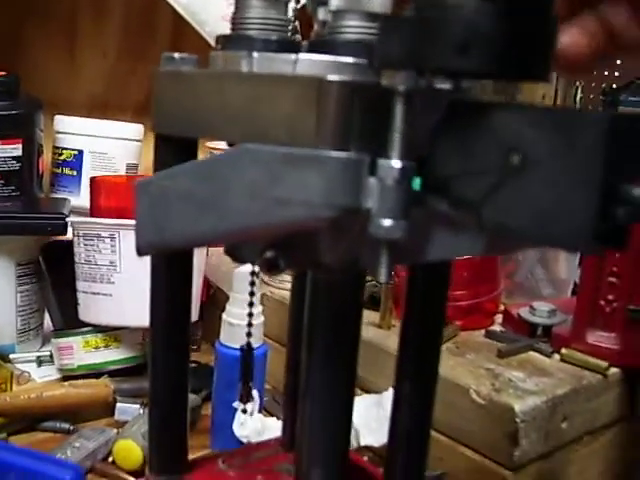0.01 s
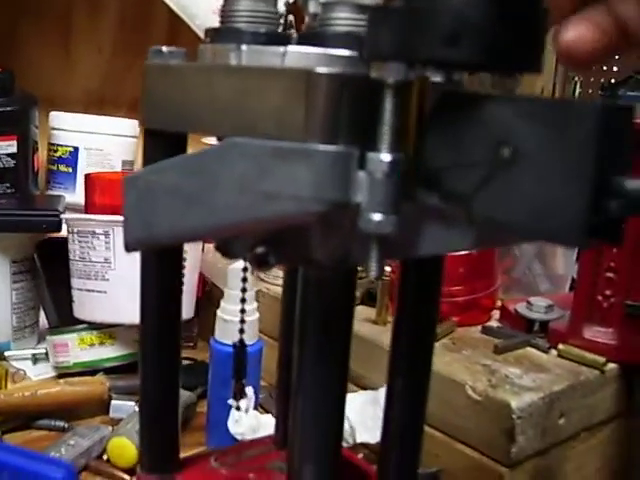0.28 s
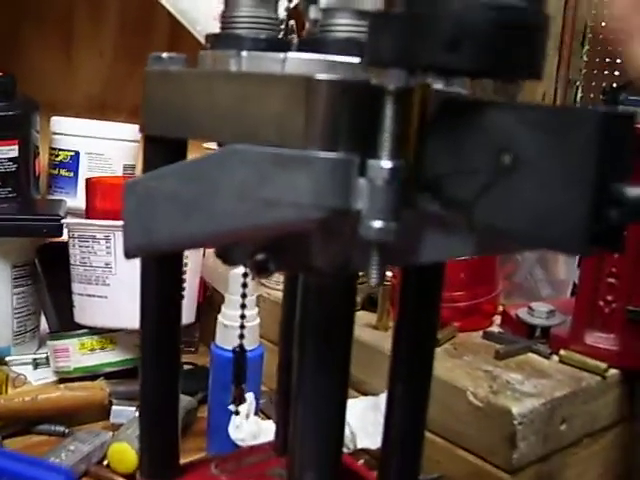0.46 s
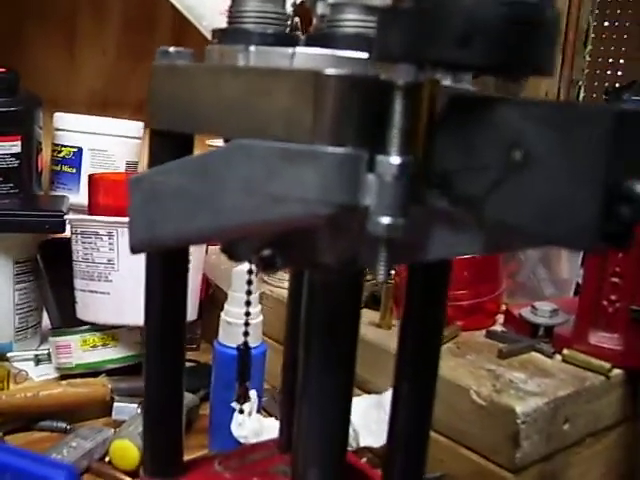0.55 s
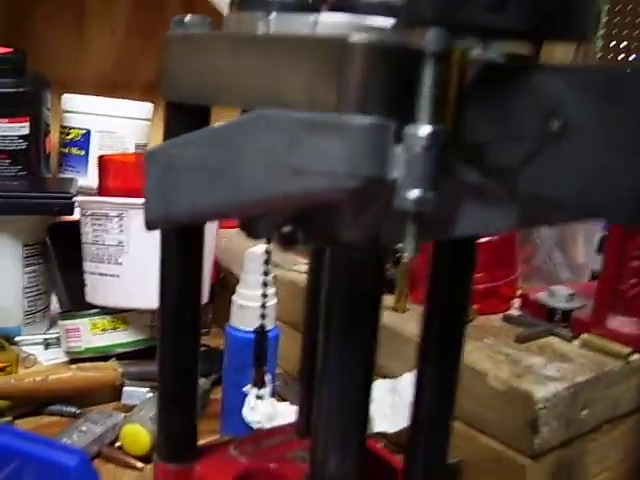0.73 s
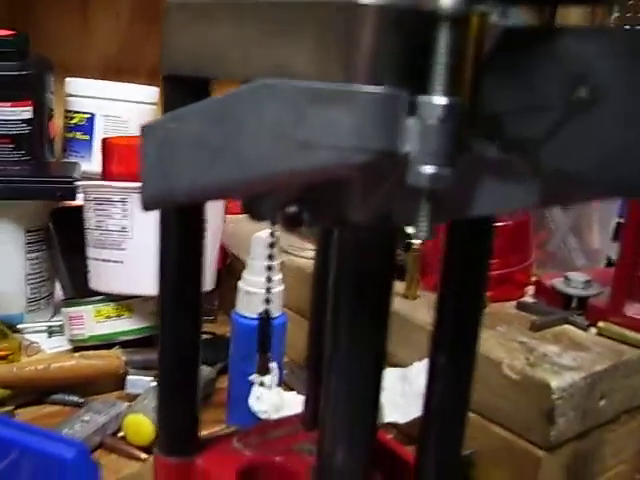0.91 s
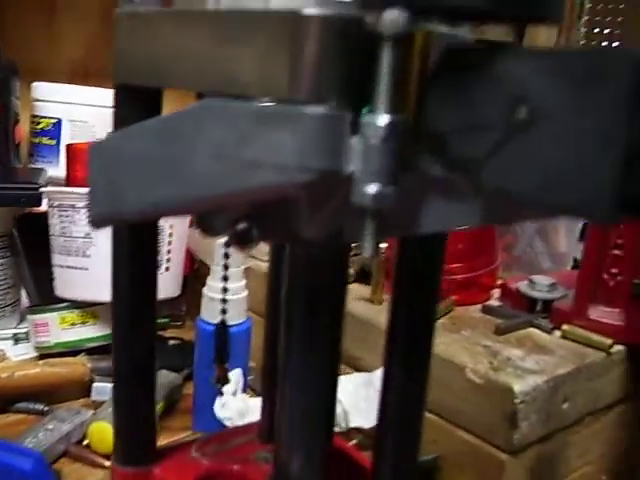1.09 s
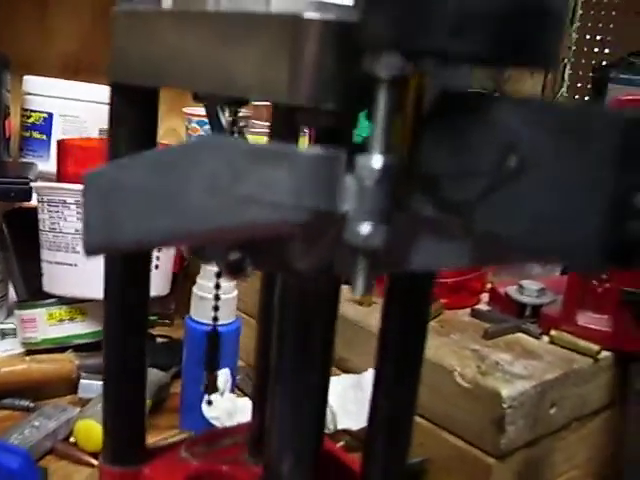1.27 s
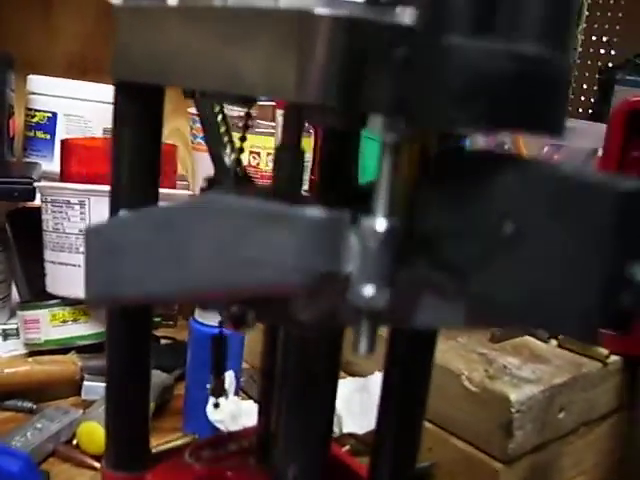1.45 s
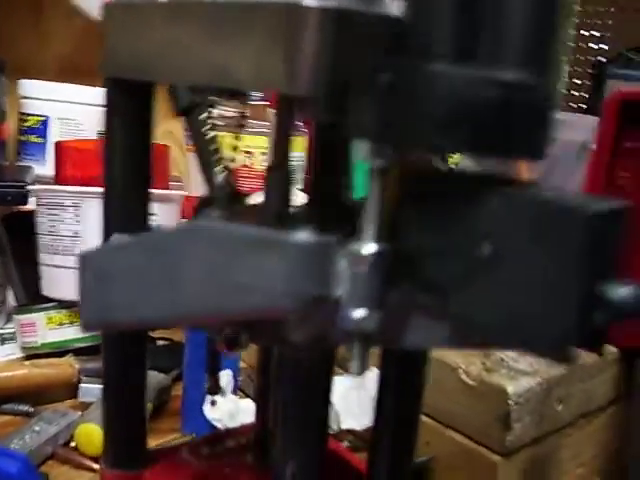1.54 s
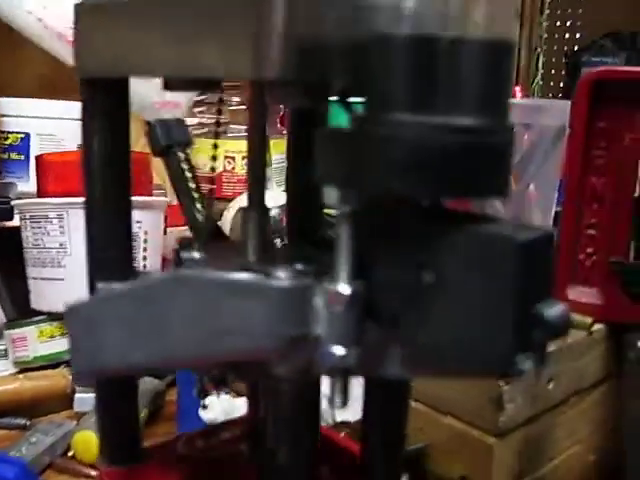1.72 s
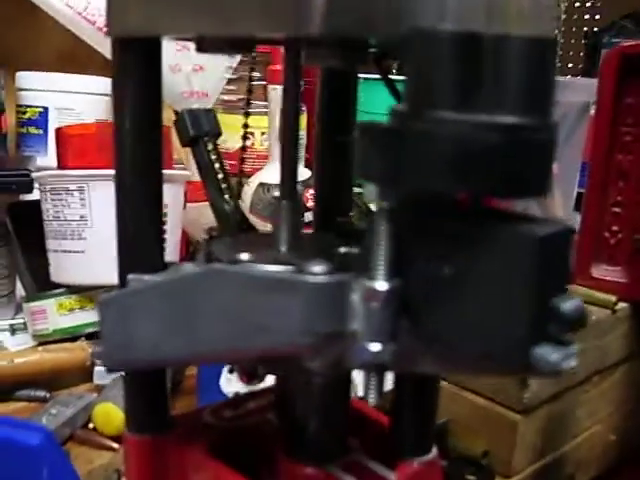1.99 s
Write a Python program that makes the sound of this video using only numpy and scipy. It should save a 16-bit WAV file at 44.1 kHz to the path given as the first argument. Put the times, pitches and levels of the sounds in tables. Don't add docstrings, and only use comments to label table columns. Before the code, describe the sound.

A hand-operated metal press, close and dry on a wooden bench. Small ticks and tinkles from 0.1 s lead to a very loud, distorted latch snap at 0.21 s, with rattling fading by 0.5 s. Mostly hiss until soft knocks at 0.9-1.2 s. From 1.35 s the ram clatters and slides grittily, landing with a loud clunk at 1.75 s, then settling rattles. Narrow, dull small-microphone sound throughout.

```python
import sys
import numpy as np
from scipy import signal
from scipy.fft import rfft, irfft
from scipy.io import wavfile

SR = 44100
rng = np.random.default_rng(int(sys.argv[2]) if len(sys.argv) > 2 else 0)


def amp(db):
    return 10 ** (np.asarray(db, float) / 20)


def write(x):
    x = np.atleast_2d(x).T
    wavfile.write(sys.argv[1], SR, np.round(np.clip(x, -1, 1) * 32767).astype(np.int16))


N = 88200

# frequency_hz, density_db
AIR_SPECTRUM = [(25, -19.5), (60, -12), (85, -16.5), (200, -7), (600, -3.5), (1500, -8.5), (3500, -16),
                (4100, -25)]
# start_s, level_db
JIGGLE = [
    (0, -42.5),
    (.05, -55),
    (.13, -32),
    (.19, -51),
    (.23, -33.5),
    (.3, -47.5),
    (.52, -54.5),
]

# start_s, level_db (peak), pitch_hz (centre), ring_t60_s
PLATE_TINKLES = [(.004, -43, 1280, 0.067), (.083, -33.5, 1370, .03), (.107, -23.5, 1190, 0.055),
                 (.122, -23, 1260, 0.14), (.137, -28.5, 1300, 0.07), (.197, -25, 1300, 0.064),
                 (.2183, -4.5, 1114, 0.024), (.227, -15, 1110, .04), (.233, -14, 1330, 0.043),
                 (.245, -17.5, 1210, 0.029), (.283, -22.5, 1160, 0.065), (.295, -27, 1150, .02),
                 (.307, -28, 1280, 0.035), (.345, -35.5, 1210, 0.034), (.462, -30.5, 1360, 0.046),
                 (.474, -34, 1340, 0.068), (.484, -36, 1400, .03)]
PLATE_PINGS = [
    (.4135, -28, 1450, 0.04),
    (.4375, -30, 1150, 0.11),
    (.511, -42, 1230, .04),
]
FRAME_KNOCKS = [(.007, -33.5, 644, 0.12), (.1305, -34.5, 806, .02), (.915, -38, 650, .05),
                (.922, -29.5, 554, 0.06), (1.072, -25, 810, .03), (1.0755, -20.5, 634, 0.04),
                (1.094, -23.5, 1104, .03), (1.0975, -17.5, 588, 0.05), (1.107, -27.5, 700, .05),
                (1.118, -29, 1200, .03), (1.1932, -22, 900, 0.03), (1.199, -25.5, 896, .05),
                (1.362, -30, 609, 0.1), (1.369, -20.5, 1206, .03), (1.384, -10, 927, 0.03),
                (1.3885, -10.5, 970, .04), (1.398, -19, 906, .04), (1.404, -32.5, 660, 0.067),
                (1.589, -23.5, 670, 0.041), (1.741, -13, 746, .04), (1.7455, -1.5, 1023, 0.025),
                (1.7512, -3, 740, 0.025), (1.7568, -9, 970, 0.029), (1.766, -22.5, 900, 0.03),
                (1.773, -17.5, 950, .03), (1.864, -26, 620, .1), (1.884, -21.5, 668, .1)]
FRAME_RINGS = [(.221, -16.5, 671, 0.11), (.925, -35.5, 545, 0.17), (1.076, -28, 342, 0.029),
               (1.195, -26, 1500, 0.03), (1.198, -25.5, 652, 0.13), (1.288, -32.5, 980, 0.31),
               (1.293, -33, 345, 0.69), (1.334, -33, 351, 0.52), (1.389, -16, 616, 0.076),
               (1.44, -30.5, 351, 0.13), (1.495, -31, 438, .2), (1.53, -36, 983, 0.26),
               (1.565, -30, 558, 0.1), (1.635, -29.5, 970, 0.24), (1.66, -27, 1024, 0.18),
               (1.675, -26.5, 430, 0.1), (1.755, -14.5, 1320, 0.12), (1.756, -10.5, 665, .08)]
LATCH_CHATTER = [(.1012, -20.5, 2200, .015), (.1178, -23.5, 2700, .025), (.1302, -17.5, 2180, .015),
                 (1.3008, -28.5, 3410, 0.027), (1.3592, -18, 3020, 0.03), (1.3685, -23, 2550, 0.048),
                 (1.381, -21.5, 2870, .03), (1.385, -14, 2580, .03), (1.389, -7.5, 2880, 0.03),
                 (1.3972, -14, 2380, 0.02), (1.405, -22, 3200, .03), (1.4182, -17, 2300, 0.027),
                 (1.4312, -11.5, 3510, 0.04), (1.441, -9.5, 2800, 0.029), (1.453, -19.5, 2490, .03),
                 (1.4609, -20.5, 2430, 0.04), (1.465, -14.5, 2420, .02), (1.477, -18, 3200, .02),
                 (1.4817, -21.5, 2410, 0.019), (1.586, -21, 2570, .03), (1.66, -25, 2570, .03),
                 (1.729, -27, 2870, 0.03), (1.742, -20, 3090, .03), (1.7476, -13, 2700, 0.058),
                 (1.7671, -18.5, 3550, 0.025), (1.777, -9, 3350, 0.015), (1.787, -19, 2770, 0.03),
                 (1.793, -20.5, 2970, .02), (1.8149, -19.5, 2780, 0.017), (1.9557, -30.5, 3470, 0.06)]
LATCH_TICKS = [(.1795, -38, 2690, .015), (.2118, 4.5, 3200, 0.012), (.2148, 2, 3100, 0.015),
               (.217, -0.5, 3400, .012), (.2195, -2.5, 2700, .015), (.2236, 0, 3200, 0.01),
               (.228, -12.5, 2800, .01), (.238, -19, 2860, 0.011), (.2485, -10.5, 3090, 0.0086),
               (.252, -18, 3000, .01), (.2622, -15, 3090, 0.0087), (.271, -16.5, 2775, 0.019),
               (.277, -20, 2710, 0.018), (.281, -17.5, 2536, 0.055), (.3188, -21.5, 3370, 0.018),
               (.3796, -25.5, 3560, 0.031), (1.0715, -28, 2290, 0.018), (1.077, -36, 2980, .015),
               (1.0928, -23, 2500, 0.015), (1.106, -34, 2300, .03), (1.2, -31, 2980, 0.03)]
BENCH_THUMPS = [
    (.11, -43, 127, .1),
    (.915, -43.5, 101, 0.25),
    (1.095, -45, 192, 0.11),
    (1.2, -39, 97, 0.34),
    (1.38, -32, 135, 0.11),
    (1.8, -38.5, 102, 0.38),
    (1.745, -25.5, 176.8, 0.34),
    (1.875, -38, 188, 0.23),
    (1.89, -40.5, 110, .25),
]

# time_s, rub_level_db, brightness_db
RAM_STROKE = [(1.25, -58, 1), (1.3, -47, -2), (1.355, -34, -15), (1.39, -27.5, 0), (1.45, -33, 1.5),
              (1.51, -34, 1), (1.6, -34.5, -7), (1.625, -35, -8), (1.68, -35, -3), (1.722, -34, -11),
              (1.77, -33.5, 6.5), (1.84, -36.5, 1), (1.9, -37, -1.5), (1.93, -44, -6.5), (1.96, -44, 4),
              (2.0, -58, -2)]

# frequency_hz, level_db
STEEL_MODES = [(1880, 5.5), (2110, 1.5), (2340, 3.5), (2400, -3.5), (2530, 2.5), (2655, -2.5), (2712, 4),
               (2895, -2), (2980, 7), (3070, -3), (3300, 6.5), (3450, 6), (3650, 3), (4000, 3)]
PLATE_MODES = [(940, 7.5), (1022, -14.5), (1112, 4.5), (1160, 1), (1236, 12), (1316, -11.5), (1390, 1.5),
               (1450, 8), (1530, -8)]
FRAME_MODES = [(300, -5), (345, -1), (440, 0.5), (545, -1), (625, 5), (690, 5), (770, 3.5), (845, 5),
               (910, 3.5), (990, 3), (1085, 2.5), (1330, 1), (1460, -10.5), (1650, -2)]
BENCH_MODES = [(62, -18.5), (104, -3.5), (128, 1), (188, 8), (250, 11)]


def evened(x):
    return x / np.sqrt(np.mean(x ** 2) + 1e-20)


def curve(points, column=1):
    p = np.array(points)
    return np.interp(np.arange(N) / SR, p[:, 0], p[:, column], left=-120)


def add(mix, start_s, sound):
    part = mix[round(start_s * SR):][:len(sound)]
    part += sound[:len(part)]


def blows(events, modes, reach_oct, contact_s):
    out = np.zeros(N)
    hz, db = np.transpose(modes)[:, :, None]
    luck = rng.standard_normal((len(events), 3, len(modes), 1))
    grit = rng.standard_normal((len(events), 1500))
    spread = 2.18
    for (start_s, peak_db, centre_hz, t60), (gain, decay, detune), rough in zip(events, luck, grit):
        count = len(rough)
        t = np.arange(count + round(1.2 * min(t60, 0.4) * SR)) / SR
        near = np.exp(-0.5 * (np.log2(hz / centre_hz) / reach_oct) ** 2)
        mode_t60 = t60 * np.exp(0.093 * decay) + 0.00072
        fade = amp(db + 2 * gain - 60 * t / mode_t60)
        onset = np.minimum(t[:count] / 0.00073, 1)
        push = rough * np.exp(-t[:count] / contact_s) * onset
        phase = 2 * np.pi * hz * (1 + 0.005 * detune) * t
        felt = abs(np.exp(1j * phase[:, :count]) @ push)[:, None] + 0.4 * np.linalg.norm(push)
        ring = (near * fade / felt * np.sin(phase)).sum(axis=0)
        ring = signal.fftconvolve(ring, push)
        band = signal.butter(3, [centre_hz / spread, centre_hz * spread], "band", fs=SR)
        ring = signal.lfilter(*band, ring)
        add(out, start_s, amp(peak_db) * ring / abs(ring).max())
    return out


def rubbed(modes, width_hz, spread_db):
    grains_per_s = 1600
    grains = amp(spread_db * np.minimum(rng.exponential(1, N), 5)) * rng.standard_normal(N)
    grains *= rng.random(N) < grains_per_s / SR
    out = np.zeros(N)
    r = np.exp(-np.pi * width_hz / SR)
    for k, (hz, db) in enumerate(modes):
        pole = [1, -2 * r * np.cos(2 * np.pi * hz / SR), r * r]
        delayed = np.roll(grains, 37 * k)
        out += amp(db) * signal.lfilter([1, 0, -1], pole, delayed)
    return evened(out)


def air():
    f, db = np.transpose(AIR_SPECTRUM)
    hz = np.fft.rfftfreq(N, 1 / SR)
    shape = amp(np.interp(np.log(hz + 1), np.log(f + 1), db))
    hiss = irfft(rfft(rng.standard_normal(N)) * shape, N)
    return amp(-46.5) * evened(hiss)


def loose_parts():
    moving = np.arange(N) < JIGGLE[-1][0] * SR
    plate_rub = rubbed(PLATE_MODES, 55, 1.5)
    steel_rub = amp(-11.5) * rubbed(STEEL_MODES, 130, 2.7)
    frame_rub = amp(-5.5) * rubbed(FRAME_MODES, 100, 2.3)
    return amp(curve(JIGGLE)) * moving * (plate_rub + steel_rub + frame_rub)


def plate():
    tinkles = blows(PLATE_TINKLES, PLATE_MODES, reach_oct=0.12, contact_s=0.0038)
    pings = blows(PLATE_PINGS, PLATE_MODES, reach_oct=0.053, contact_s=0.0023)
    return tinkles + pings


def frame():
    knocks = blows(FRAME_KNOCKS, FRAME_MODES, reach_oct=0.45, contact_s=0.002)
    rings = blows(FRAME_RINGS, FRAME_MODES, reach_oct=0.063, contact_s=0.0031)
    return knocks + rings


def latch():
    chatter = blows(LATCH_CHATTER, STEEL_MODES, reach_oct=0.34, contact_s=0.0025)
    ticks = blows(LATCH_TICKS, STEEL_MODES, reach_oct=0.19, contact_s=0.0012)
    return chatter + ticks


def bench():
    return blows(BENCH_THUMPS, BENCH_MODES, reach_oct=0.18, contact_s=0.005)


def ram():
    level_db = curve(RAM_STROKE)
    bright_db = np.maximum(curve(RAM_STROKE, column=2), -40)
    drone = amp(1.5) * rubbed(FRAME_MODES, 50, 3.4)
    grit = amp(1 + bright_db) * rubbed(STEEL_MODES, 94, 1.6)
    rumble = amp(-9.5) * rubbed(BENCH_MODES[1:], 21, 2.5)
    return amp(level_db) * (drone + grit + rumble)


def room(x):
    t60, gap = 0.15, 22
    taps = np.zeros(SR // 2)
    at = np.arange(120, len(taps) - gap, gap)
    taps[at + rng.integers(0, gap, len(at))] = rng.choice([-1., 1.], len(at))
    taps *= amp(-60 * np.arange(len(taps)) / SR / t60)
    return signal.fftconvolve(x, taps / np.linalg.norm(taps))[:N]


def scene():
    hiss = air()
    press = loose_parts() + plate() + frame() + latch() + bench() + ram()
    bass_cut = signal.butter(4, 103, "high", fs=SR, output="sos")
    press = signal.sosfilt(bass_cut, press)
    return (press + amp(-13) * room(press) + hiss)[None]


def band_limit(x):
    return signal.sosfilt(signal.butter(12, 16860, fs=SR, output="sos"), x)


def record(dry):
    knee, ceiling = 0.79, 0.72
    edge_hz, end_hz, skirt_db_per_khz = 3478, 4440, 16.5
    held = np.clip(dry, -knee, knee)
    hz = np.fft.rfftfreq(N, 1 / SR)
    skirt_db = -skirt_db_per_khz * np.maximum(hz - edge_hz, 0) / 1000
    stop_db = -0.2 * np.maximum(hz - end_hz, 0)
    narrow = irfft(rfft(held) * amp(skirt_db + stop_db), N)
    return band_limit(np.clip(narrow, -ceiling, ceiling))


dry = scene()
out = record(dry)
write(out)
```